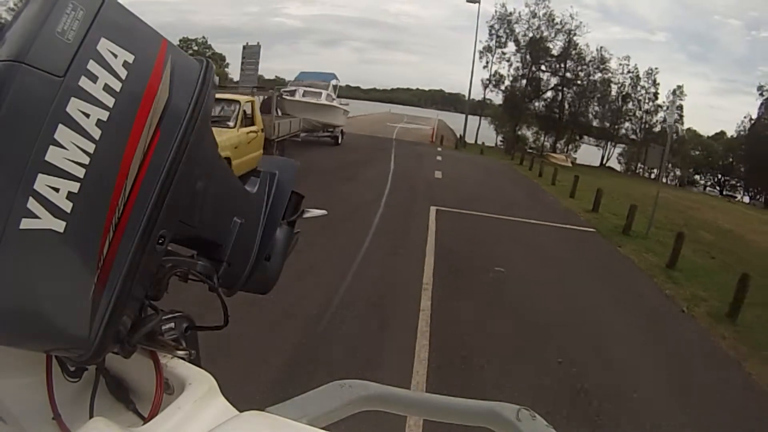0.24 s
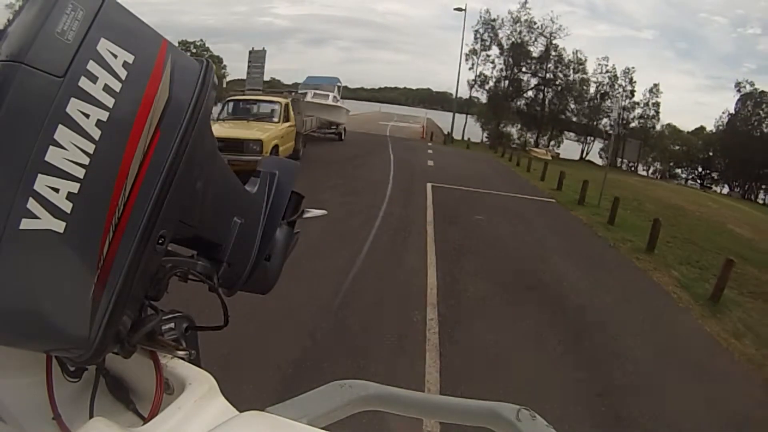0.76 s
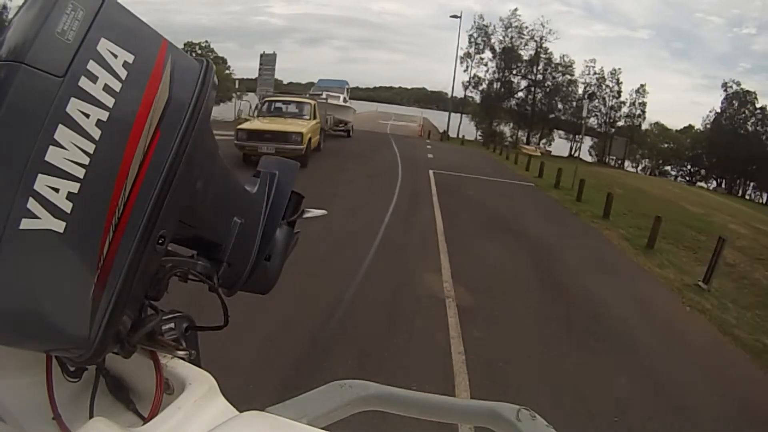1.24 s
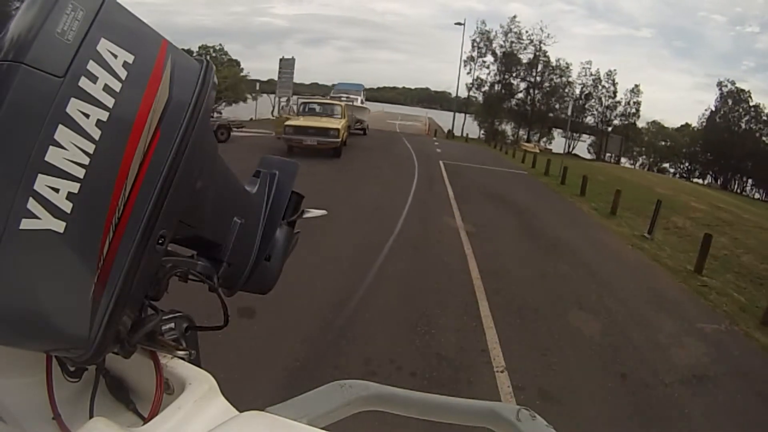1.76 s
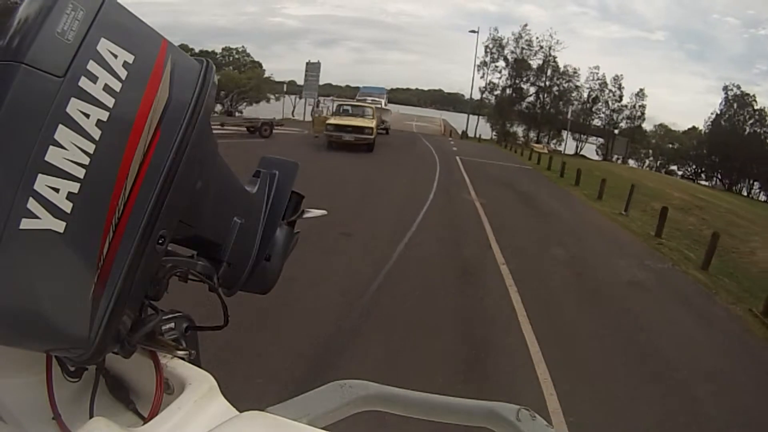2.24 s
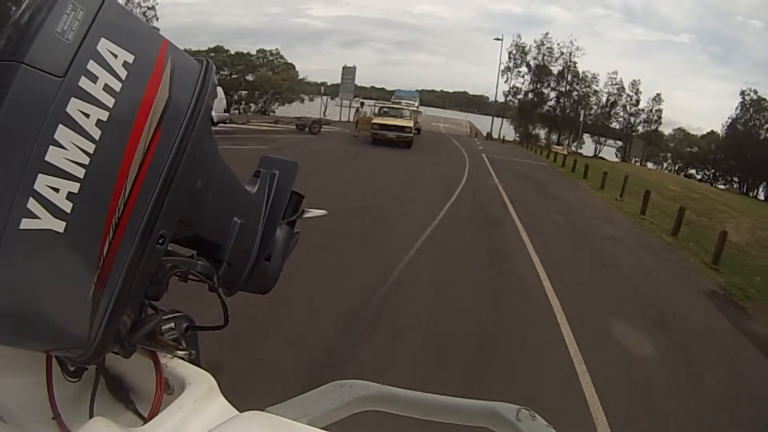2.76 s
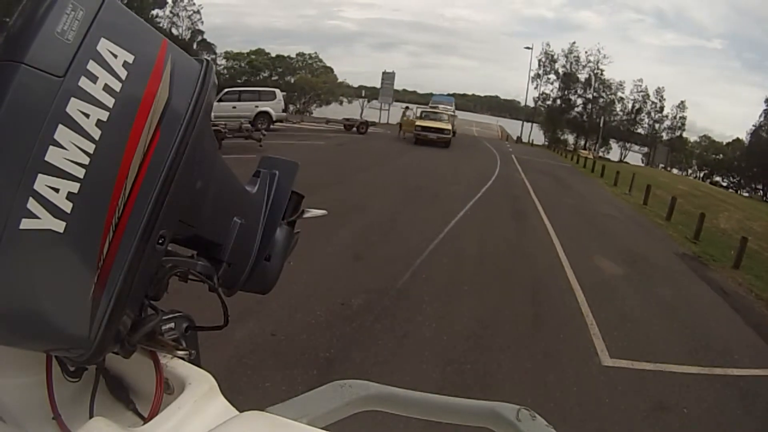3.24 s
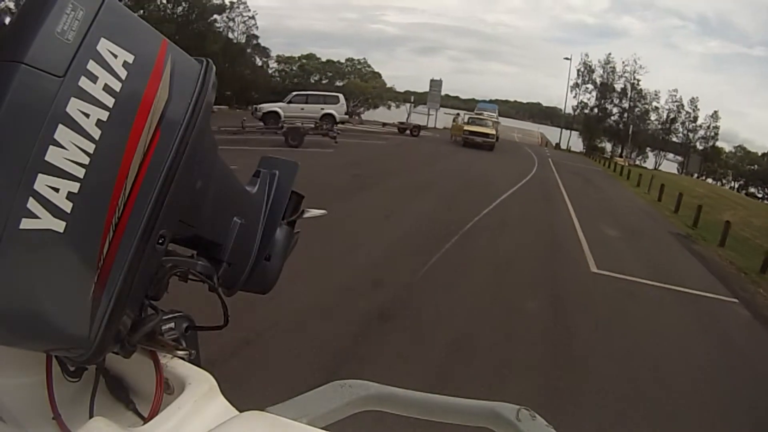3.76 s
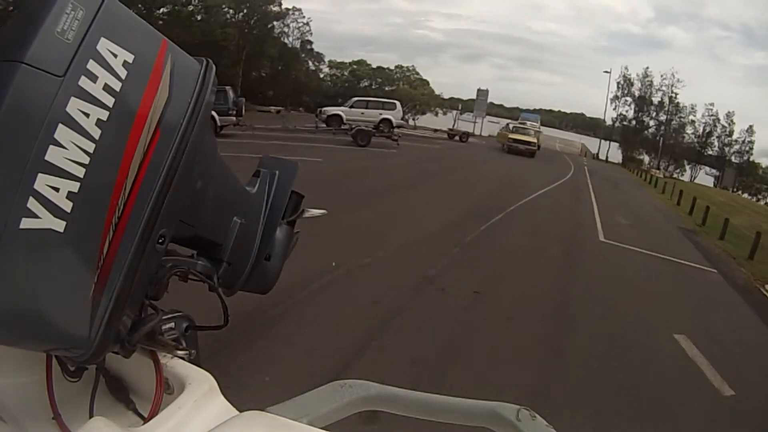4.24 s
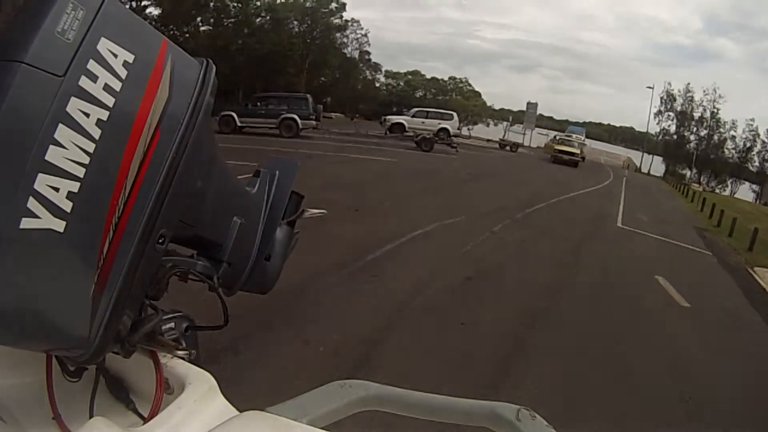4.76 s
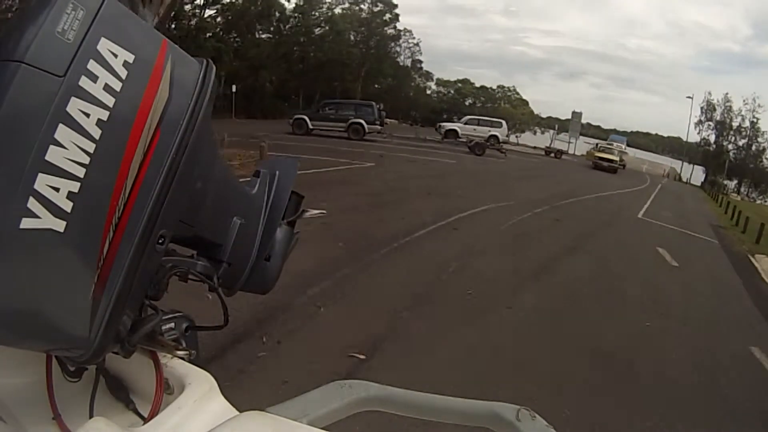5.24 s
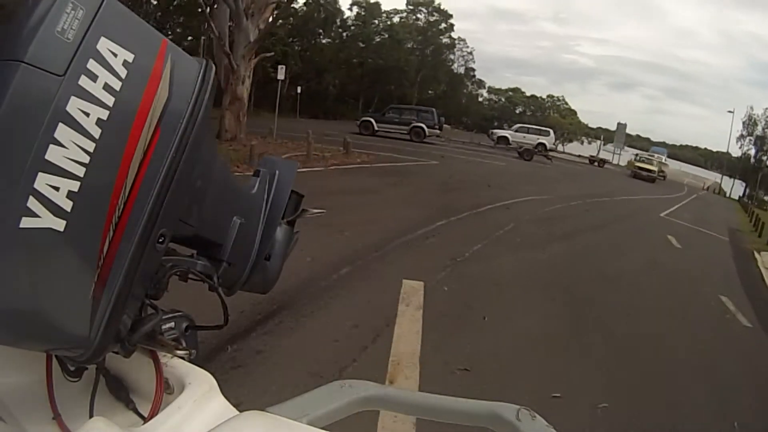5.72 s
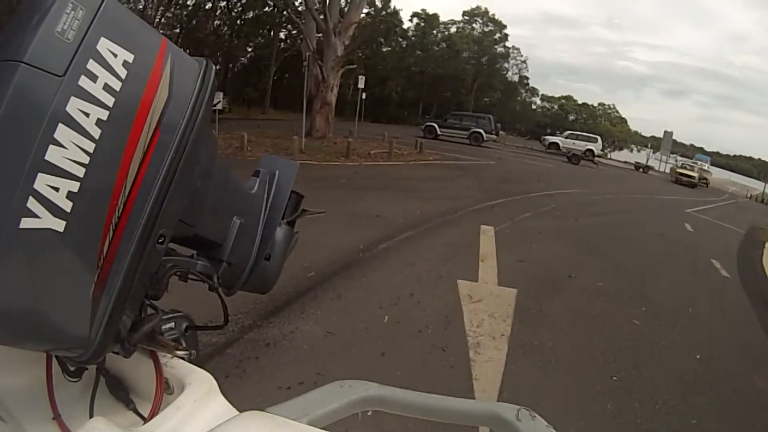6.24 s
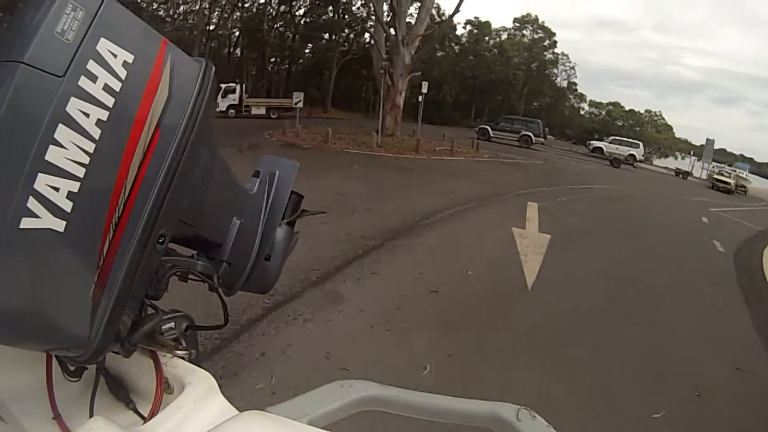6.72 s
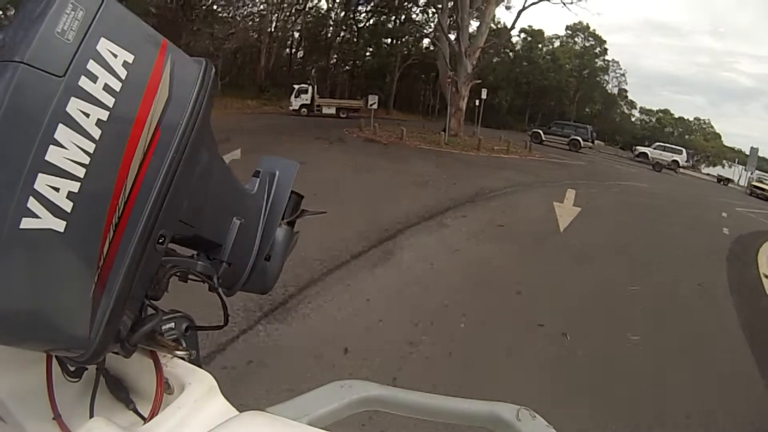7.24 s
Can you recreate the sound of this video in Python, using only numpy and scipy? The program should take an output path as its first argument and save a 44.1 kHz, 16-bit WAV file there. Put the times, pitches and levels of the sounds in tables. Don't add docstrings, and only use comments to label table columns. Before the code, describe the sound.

Close, muffled, structure-borne sound from a trailered boat: low hull boom swelling and dipping several times a second, with sub-bass sway beneath and constant dull hiss. The first seconds are fairly smooth. Then the road roughens, thin panels hum, rubber rollers squeak faintly, and a loose fitting knocks, strongest near six seconds and frequent until the abrupt end.

```python
import sys
import numpy as np
from scipy import signal
from scipy.fft import rfft, irfft, next_fast_len
from scipy.io import wavfile
from scipy.ndimage import uniform_filter1d

SR = 44100
rng = np.random.default_rng(int(sys.argv[2]) if len(sys.argv) > 2 else 0)


def invert_db(level):
    return 10 ** (np.asarray(level, dtype=float) / 20)


def generate_wav(signal):
    frames = np.transpose(np.atleast_2d(signal))
    scaled = np.clip(frames, -1, 1) * 32767
    pcm = np.round(scaled).astype(np.int16)
    wavfile.write(sys.argv[1], SR, pcm)


N = 329868

# time in seconds, level in dB over a fixed base.
ROAD_SHAKE = [(0, 8), (.5, -5), (2.1, -0.5), (2.6, -4.5), (3.3, 1), (3.7, 4.5), (3.86, 9.5), (4.2, 5),
              (4.4, 0.5), (4.65, 7), (5.2, 8), (5.8, 10), (5.96, 17.5), (6.3, 11), (6.5, 12), (7.05, 13),
              (7.25, 7), (7.48, 3)]
# start in seconds, length in seconds, dB over the usual surface.
COARSE_PATCHES = [(2.203, .15, 1.5), (3.224, .3, 0.5), (3.826, 0.47, 3.5), (4.348, 0.33, 2.5),
                  (4.702, 0.27, 5.5), (5.22, 0.48, 4), (5.673, 0.081, 7), (5.862, .33, 10.5),
                  (6.224, 0.43, 3), (6.47, 0.52, 7), (7.06, 0.16, 2), (7.31, 0.16, 3)]
# level in dB, share of shake, share of coarseness.
AXLE_DRIVE = (-40.5, 0.84, 0.05)
SPRING_DRIVE = (-37.5, 0.54, 0.05)
PANEL_DRIVE = (-55, 0.45, 0.69)
TYRE_DRIVE = (-67.5, 0.17, .9)

# frequency in Hz, density in dB per Hz.
HISS_SPECTRUM = [(240, -30), (400, 0.5), (503, -4), (534, 0), (736, -7), (1530, -8.5), (1950, -12),
                 (2690, -12.5), (10900, -27.5), (14400, -36), (15300, -33)]
HISS_DB = -59.5
# multiple of the clock frequency, level in dB.
WHINE_HARMONICS = [(2, -93), (3, -89), (4, -92), (5, -96), (7, -99)]
CLOCK_HZ = 1000
TREBLE_FROM_HZ, TREBLE_TO_HZ = 12800, 15250
DROPOUTS_PER_S, DROPOUT_S, FRAME, HOLE_SHARE = 6, 0.04, 1024, 0.35

# frequency in Hz, width in Hz, level in dB.
ROAR_MODES = [(889, 27, 2), (1109, 25, 5.5), (1260, 170, -0.5), (1475, 220, -1.5), (2250, 190, -11)]
# frequency in Hz, width in Hz, level in dB.
PANEL_MODES = [(162.7, 19.2, 6), (210.6, 11, 1.5), (235, 22, -4), (291.4, 17, -8), (341.5, 15, -1),
               (370, 27, -5), (449, 42, -13), (471, 110, -12), (696, 80, -17)]
# frequency in Hz, width in Hz, level in dB.
FLOOR_PANEL_MODE = [(344, 17, 0)]
# time in seconds, level in dB.
FLOOR_LEVEL = [
    (0, -65),
    (1.5, -66.5),
    (3.1, -64),
    (3.7, -55.5),
    (4.9, -53),
    (5.2, -61),
    (6.05, -50),
    (6.6, -54),
    (7.48, -59),
]

# start in seconds, length in seconds, first Hz, last Hz, level in dB.
ROLLER_SQUEAKS = [(2.925, 0.032, 5630, 5820, -79), (2.982, 0.023, 6100, 6320, -78),
                  (3.45, 0.1, 4050, 4240, -81), (3.48, 0.076, 3250, 3900, -75),
                  (3.535, .035, 4100, 4050, -72.5), (3.72, 0.076, 6000, 6650, -84),
                  (3.805, 0.029, 3650, 3700, -75), (3.747, 0.13, 5050, 5180, -84),
                  (4.122, 0.085, 6300, 6450, -80), (4.185, .02, 6500, 7000, -79),
                  (4.98, 0.079, 5310, 5950, -77.5), (5.03, 0.085, 5850, 7000, -83),
                  (5.515, .03, 5800, 5800, -76), (5.583, 0.074, 6500, 6400, -83),
                  (5.595, 0.021, 3480, 3580, -78), (6.309, 0.11, 4285, 4400, -79),
                  (6.523, 0.051, 4900, 4940, -77), (6.53, 0.08, 3630, 4060, -78),
                  (6.531, 0.047, 2380, 2450, -71), (6.585, 0.033, 2853, 2850, -76),
                  (6.65, 0.066, 4800, 4630, -84), (6.99, 0.057, 3780, 3930, -76),
                  (7.13, 0.071, 4900, 5040, -83), (7.149, 0.044, 6200, 6455, -86)]
# start in seconds, length in seconds, middle Hz, width Hz,
# level in dB.
ROLLER_SCUFFS = [
    (3.429, 0.15, 4200, 2464, -69.5),
    (3.697, 0.18, 4200, 2207, -72),
    (6.256, 0.25, 5000, 2020, -71.5),
    (6.509, 0.28, 4400, 1800, -73),
    (7.001, 0.36, 4740, 2001, -72.5),
]

# time in seconds, peak in dB, bright part in dB, low thud in dB.
BLOWS = [(2.141, -50, -24, -9), (3.373, -39, -20, -10), (3.662, -48, -19, -11), (3.909, -49, -15, -4),
         (4.125, -45, -33, -12), (4.727, -41.5, -20, 0), (4.92, -46, -23, -8), (5.32, -43.5, -13, -12),
         (5.716, -30.5, -17, -2), (6.194, -35, -14, 0), (6.292, -44, -10, -3), (6.468, -41, -15, -1),
         (6.611, -33.5, -22, -3), (6.639, -52, -29, -8), (6.747, -37, -18, -1), (6.903, -43.5, -18, -8),
         (7.203, -39, -14, 1), (7.391, -36.5, -17, -2.5)]
# frequency in Hz, level in dB, delay in seconds, ring in seconds.
FITTING_PARTS = [
    (688, -3.5, 0.0007, 0.0038),
    (1307, -12, .004, 0.0023),
    (1820, -22, 0.00046, 0.0024),
]
# frequency in Hz, level in dB, delay and ring in seconds.
FITTING_BRIGHT = (2420, 1.1, 0.00023, 0.0015)
FITTING_LOW = (427, 0.2, 0.00904, 0.002)

# frequency in Hz, width in Hz, level in dB.
SPRING_MODE = [(14.84, 2.3, 0)]
# frequency in Hz, density in dB per Hz.
AXLE_SPECTRUM = [(14, -40), (24, -1), (30, 0), (53, -1), (64, -9), (95, -9), (150, -15), (185, -23),
                 (260, -40), (500, -130)]
# middle in seconds, length in seconds, dB over the usual shake.
AXLE_JOLTS = [(0.124, 0.1, -11), (.71, .12, 8), (2.958, .15, 8), (3.855, 0.093, 6.5), (4.153, 0.15, 7),
              (4.64, 0.16, 3), (5.214, .08, 3.5), (5.49, .1, 3.5), (5.95, 0.16, 3), (6.147, .08, 5),
              (6.44, 0.12, 8.5), (6.658, .16, 6), (6.973, 0.065, 1), (7.12, 0.11, 5.5)]

# frequency in Hz, width in Hz, level in dB.
HULL_MODES = [(114, 20, -1), (130, 20, -1)]
# middle in seconds, length in seconds, peak in dB, pitch in Hz.
BOOM_SWELLS = [(0.1, 0.29, -26, 117.1), (0.343, 0.19, -21.5, 121.0), (0.552, 0.17, -22, 120.7),
               (0.681, 0.19, -25, 116.7), (0.99, 0.15, -21, 125.2), (1.3, 0.27, -25.5, 129.8),
               (1.41, 0.34, -23, 117.3), (1.805, 0.28, -22, 118.9), (2.019, 0.34, -26.5, 121),
               (2.314, 0.19, -20.5, 119), (2.743, 0.16, -20.5, 120.3), (2.962, 0.24, -24.5, 118.3),
               (3.148, 0.25, -25.5, 123.4), (3.348, 0.32, -23.5, 121.5), (3.405, 0.3, -25, 113.4),
               (3.8, 0.19, -23.5, 117.5), (3.933, 0.11, -24.5, 120.6), (4.19, 0.24, -25, 122.8),
               (4.714, 0.2, -28, 115.3), (4.957, 0.28, -26, 127.1), (5.267, 0.3, -24, 120.1),
               (5.49, 0.2, -18.6, 122.8), (5.71, 0.19, -22, 125.8), (6.029, 0.23, -20.4, 129.6),
               (6.048, 0.28, -23.4, 117), (6.257, 0.19, -17.6, 121.9), (6.49, 0.1, -18, 123),
               (6.643, 0.098, -20, 123.2), (6.89, 0.1, -20, 129.8), (7.319, 0.3, -26.5, 118.6)]
BOOM_LULLS = [.254, .413, .608, .753, .916, 1.039, 1.546, 1.683, 1.906, 2.104, 2.195, 2.576, 3.261, 3.347,
              3.465, 3.61, 3.728, 4.0, 4.44, 4.825, 5.138, 5.409, 5.773, 6.086, 6.449, 6.59, 6.753, 7.093,
              7.429]
LULL_S, LULL_DEPTH = 0.055, 0.75
BEATING_DB, BEATING_SHAKE_SHARE = -32, 0.14
YIELD = 0.61


def evened(x):
    return x / np.sqrt(np.mean(x ** 2) + 1e-20)


def coloured(gain):
    size = next_fast_len(N)
    hz = np.fft.fftfreq(size, 1 / SR)
    a, b = rng.standard_normal((2, size))
    spectrum = (a + 1j * b) * gain(np.maximum(hz, 1)) * (hz > 0)
    return np.fft.ifft(spectrum)[:N]


def slope(points):
    f, db = np.transpose(points)
    return lambda hz: invert_db(np.interp(np.log(hz), np.log(f), db))


def peaks(modes, steep):
    def gain(hz):
        power = sum(invert_db(2 * db) / (1 + (2 * (hz - f) / width) ** 2) ** steep for f, width, db in modes)
        return np.sqrt(power)
    return gain


def steadied(z, share, size):
    power = abs(uniform_filter1d(abs(z) ** 2, size)) + 1e-20
    return evened((z / power ** (share / 2)).real)


def flutter(hz, depth_db):
    wander = coloured(lambda f: 1 / (1 + (f / hz) ** 4)).real
    return invert_db(depth_db * evened(wander))


def add(mix, s, sound):
    part = mix[round(s * SR):][:len(sound)]
    part += sound[:len(part)]


def driven(level_db, shake_share, coarse_share):
    s, db = np.transpose(ROAD_SHAKE)
    shake_db = np.interp(np.arange(N) / SR, s, db)
    coarse_db = np.zeros(N)
    for start, length, patch_db in COARSE_PATCHES:
        add(coarse_db, start, patch_db * signal.windows.tukey(round(length * SR), 0.4))
    return invert_db(level_db + shake_share * shake_db + coarse_share * coarse_db)


def microphone_noise():
    t = np.arange(N) / SR
    hiss = invert_db(HISS_DB) * evened(coloured(slope(HISS_SPECTRUM)).real) * flutter(22, 0.42)
    whine = sum(invert_db(db + 3) * np.sin(2 * np.pi * k * CLOCK_HZ * t) for k, db in WHINE_HARMONICS)
    return hiss + whine


def broken_treble(x):
    hz, spectrum = np.fft.rfftfreq(N, 1 / SR), rfft(x)
    body = irfft(spectrum * (hz < TREBLE_FROM_HZ), N)
    top = irfft(spectrum * (hz >= TREBLE_FROM_HZ) * (hz < TREBLE_TO_HZ), N)
    z = signal.stft(top, nperseg=FRAME)[2]
    survives = rng.random(z.T.shape).T > HOLE_SHARE
    top = signal.istft(z * survives, nperseg=FRAME)[1][:N]
    kept = np.ones(N)
    starts, lengths = rng.random((N // FRAME, 2)).T
    for k in np.flatnonzero(starts < DROPOUTS_PER_S * FRAME / SR):
        frames = int(1 - np.log(lengths[k]) * (DROPOUT_S * SR / FRAME - 0.5))
        kept[k * FRAME:][:FRAME * frames] = 0.04
    return body + invert_db(6.0) * uniform_filter1d(kept, size=200) * flutter(30, 3.0) * top


def roar():
    excess = np.maximum(driven(*TYRE_DRIVE) ** 2 - invert_db(-69.0) ** 2, invert_db(-82.5) ** 2)
    noise = coloured(peaks(ROAR_MODES, 1.9)).real * flutter(31, 2.8)
    return invert_db(-1.1) * np.sqrt(excess) * evened(noise)


def squeaks():
    out = np.zeros(N)
    fuzz = coloured(peaks([(200, 70, 0)], 1.5)) * np.exp(-2j * np.pi * 200 * np.arange(N) / SR)
    fuzz = 0.9 + 0.5 * fuzz / np.std(fuzz)
    for s, length, first_hz, last_hz, db in ROLLER_SQUEAKS:
        count = round(length * SR)
        glide = np.exp(2j * np.pi * np.cumsum(np.linspace(first_hz, last_hz, count)) / SR)
        tone = (fuzz[round(s * SR):][:count] * glide).real
        add(out, s, invert_db(db + 8.0) * signal.windows.tukey(count, 0.4) * tone)
    for s, length, hz, width, db in ROLLER_SCUFFS:
        count = round(length * SR)
        band = signal.butter(2, [hz - width / 2, hz + width / 2], "band", fs=SR)
        noise = rng.standard_normal(20000)[:count]
        add(out, s, invert_db(db) * signal.windows.tukey(count, 0.5) * evened(signal.lfilter(*band, noise)))
    return out


def panels():
    ring = steadied(coloured(peaks(PANEL_MODES, 1.094)), 0.66, size=4000) * flutter(20, 1.8)
    return invert_db(2.0) * driven(*PANEL_DRIVE) * evened(ring)


def floor_panel():
    s, db = np.transpose(FLOOR_LEVEL)
    level = invert_db(np.interp(np.arange(N) / SR, s, db))
    return level * steadied(coloured(peaks(FLOOR_PANEL_MODE, 2.0)), 0.45, size=3000)


def knocks():
    out, t = np.zeros(N), np.arange(3000) / SR
    band = signal.butter(4, [450, 1900], "band", fs=SR)
    parts = FITTING_PARTS + [FITTING_BRIGHT, FITTING_LOW]
    for (s, db, bright_db, low_db), chance in zip(BLOWS, rng.standard_normal((len(BLOWS), 3000))):
        colour = [0, 2.5 * chance[5], 2.5 * chance[6], bright_db, low_db]
        for (hz, part_db, delay, ring), more_db, turn in zip(parts, colour, chance):
            swell = t / ring * np.exp(1 - t / ring)
            tone = np.sin(2 * np.pi * (hz * (1 + 0.023 * turn) * t + turn))
            add(out, s + delay - 0.001, invert_db(db + part_db + more_db) * swell * tone)
        rattle = evened(signal.lfilter(*band, chance))
        add(out, s, invert_db(db - 20) * t / 0.006 * np.exp(1 - t / 0.0047) * rattle)
    return out


def bounce():
    sway = driven(*SPRING_DRIVE) * steadied(coloured(peaks(SPRING_MODE, 1.7)), 0.2, size=6000)
    jolt_db = np.zeros(N)
    for s, length, db in AXLE_JOLTS:
        add(jolt_db, s - length / 2, db * np.hanning(round(length * SR)))
    rumble = steadied(coloured(slope(AXLE_SPECTRUM)), 0.73, size=4000)
    return sway + driven(*AXLE_DRIVE) * invert_db(jolt_db) * flutter(5.3, 1.7) * rumble


def boom():
    notes, busy = np.zeros(N), np.zeros(N)
    for (s, length, db, hz), turn in zip(BOOM_SWELLS, rng.random((len(BOOM_SWELLS), 1))):
        t = np.arange(round(length * SR)) / SR
        start = max(s - length / 2, 0)
        swell = np.sin(np.pi * t / length) ** 2
        add(notes, start, invert_db(db) * swell * np.sin(2 * np.pi * (hz * t + turn)))
        add(busy, start, swell)
    beating = steadied(coloured(peaks(HULL_MODES, 3)), 0.63, size=3000)
    beating = driven(BEATING_DB, BEATING_SHAKE_SHARE, 0) * beating
    hush = np.ones(N)
    for s in BOOM_LULLS:
        add(hush, s - LULL_S / 2, -LULL_DEPTH * np.hanning(round(LULL_S * SR)))
    return invert_db(0.54) * hush * (notes + np.clip(1 - YIELD * busy, 0, 1) * beating)


def scene():
    return (roar() + squeaks() + panels() + floor_panel() + knocks() + bounce() + boom())[None]


def low_pass(x):
    return signal.sosfilt(signal.butter(12, 15580, fs=SR, output="sos"), x)


def record(dry):
    t = np.arange(N) / SR
    fade = np.minimum((t[-1] - t) / 0.004, 1)
    return low_pass(fade * (dry + broken_treble(microphone_noise())))


dry = scene()
out = record(dry)
generate_wav(out)
```